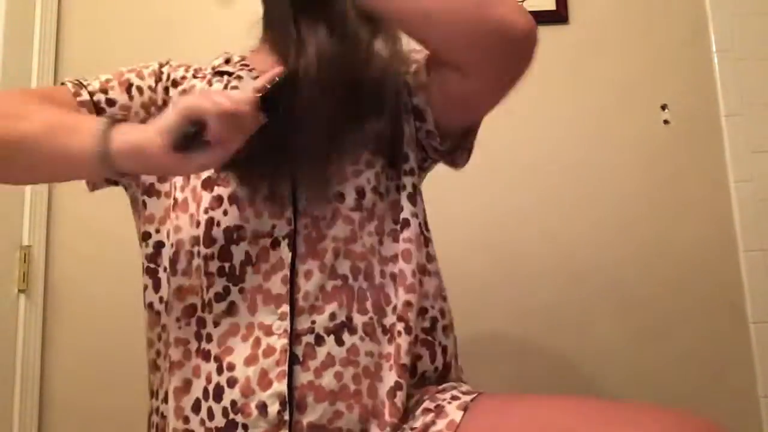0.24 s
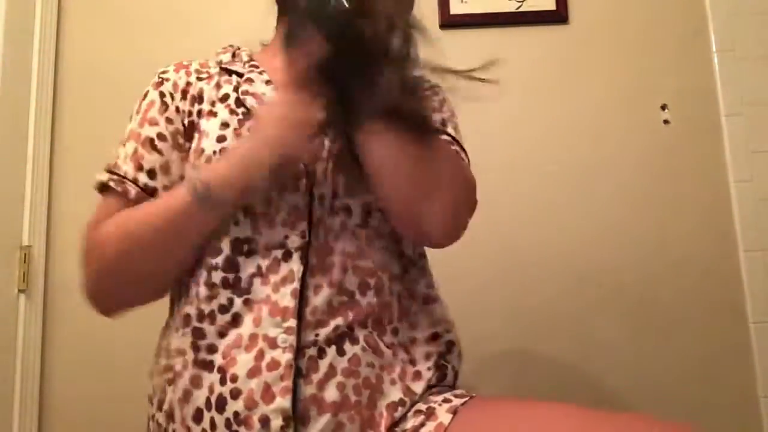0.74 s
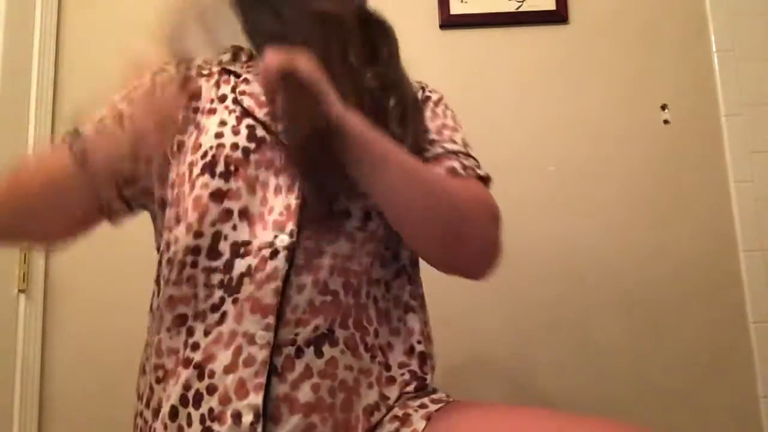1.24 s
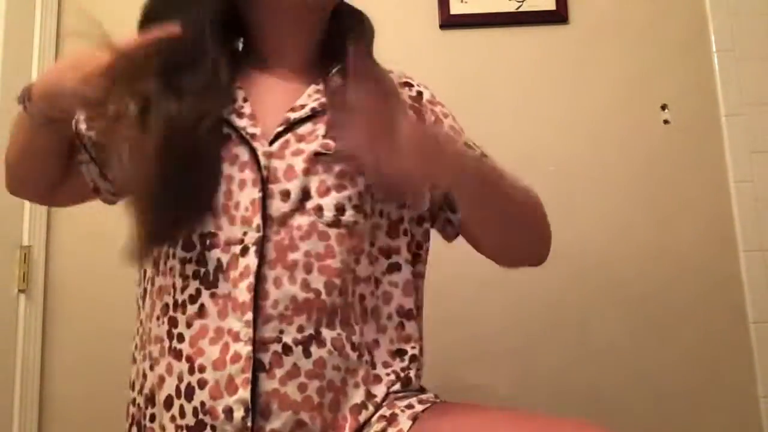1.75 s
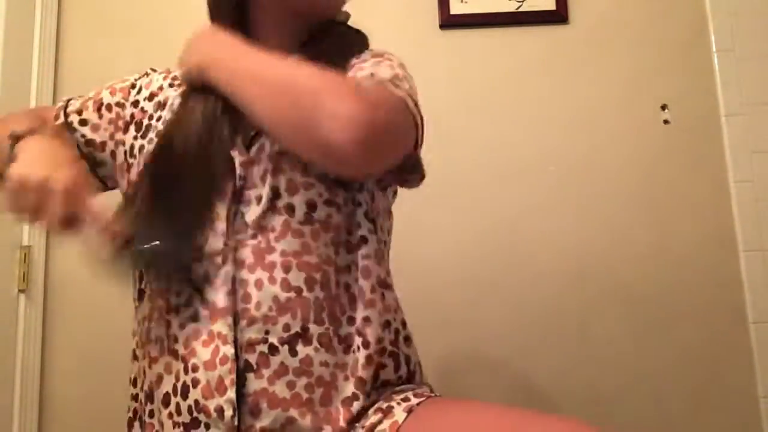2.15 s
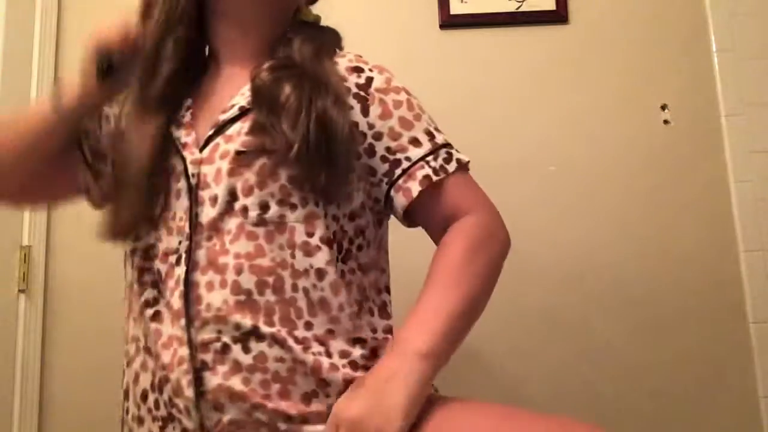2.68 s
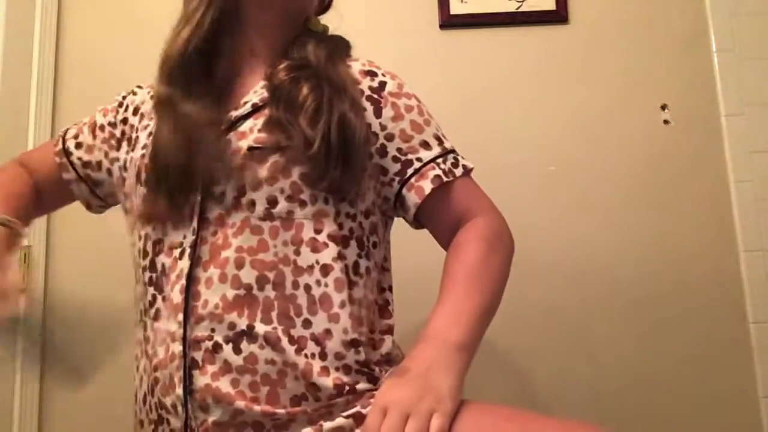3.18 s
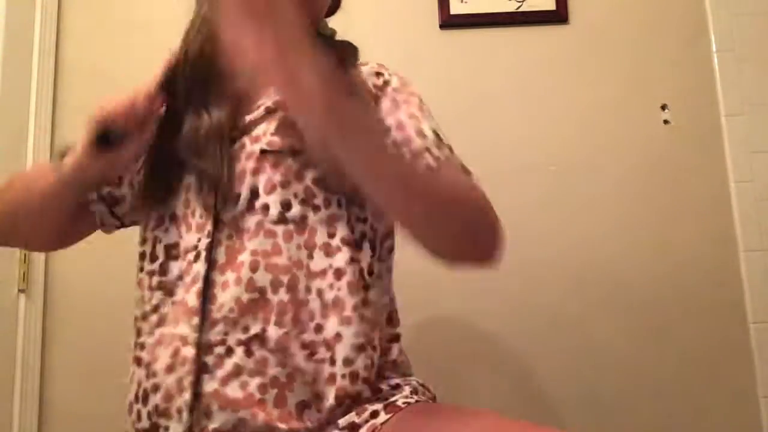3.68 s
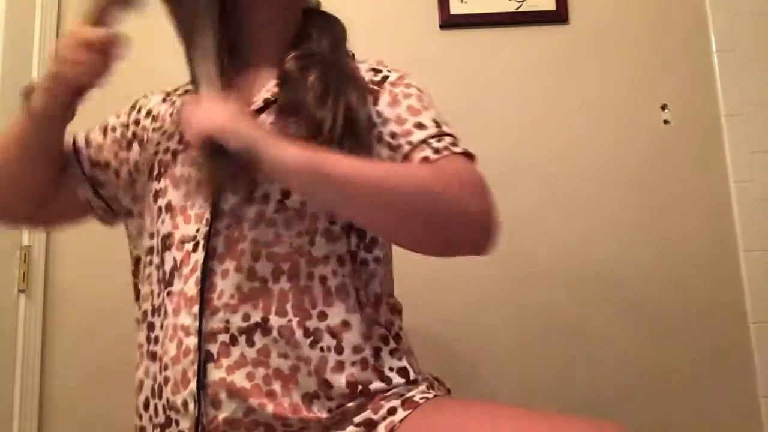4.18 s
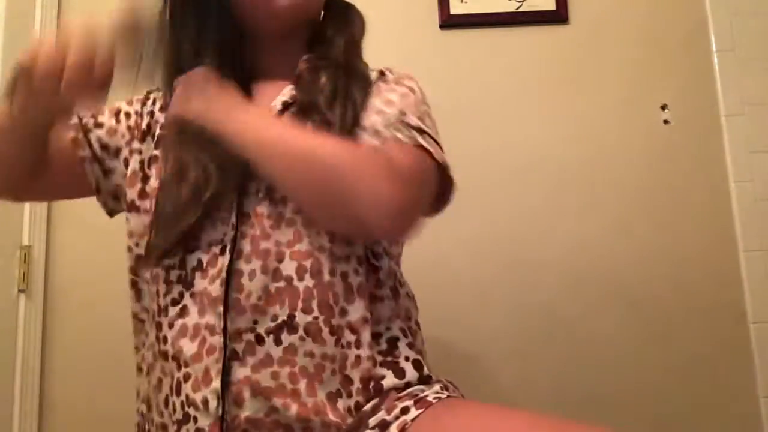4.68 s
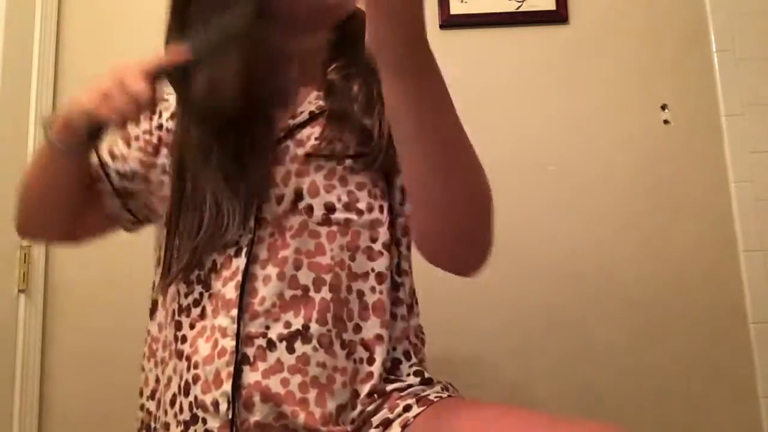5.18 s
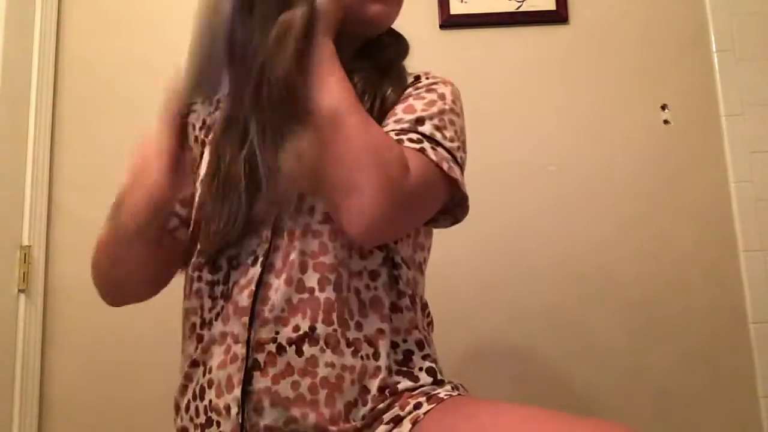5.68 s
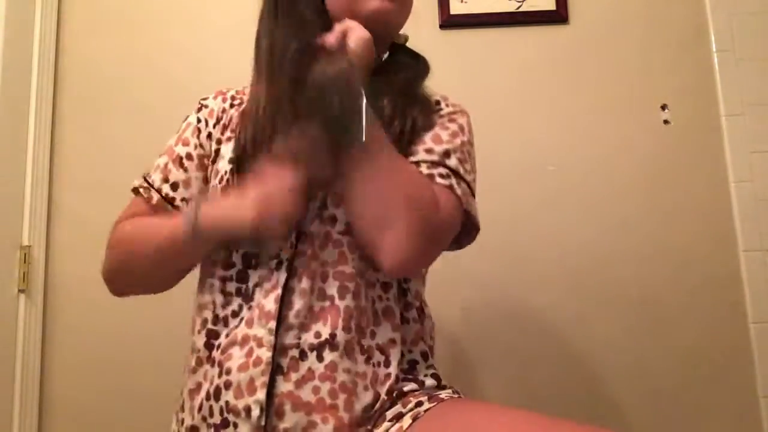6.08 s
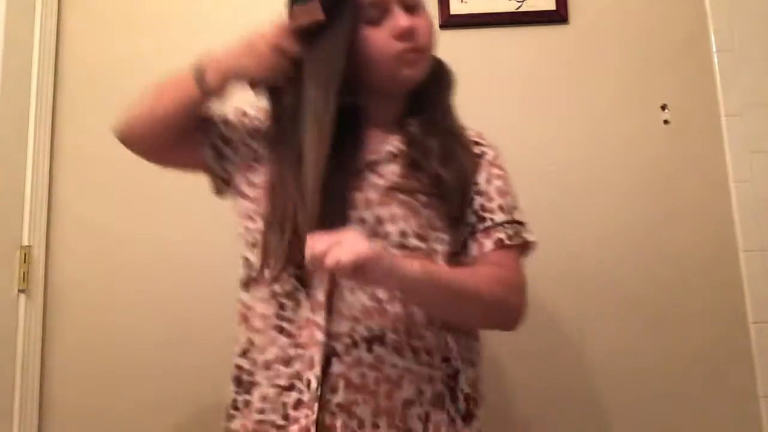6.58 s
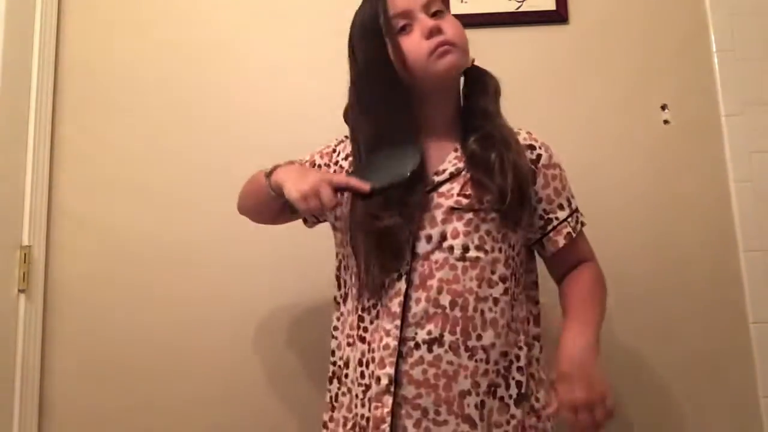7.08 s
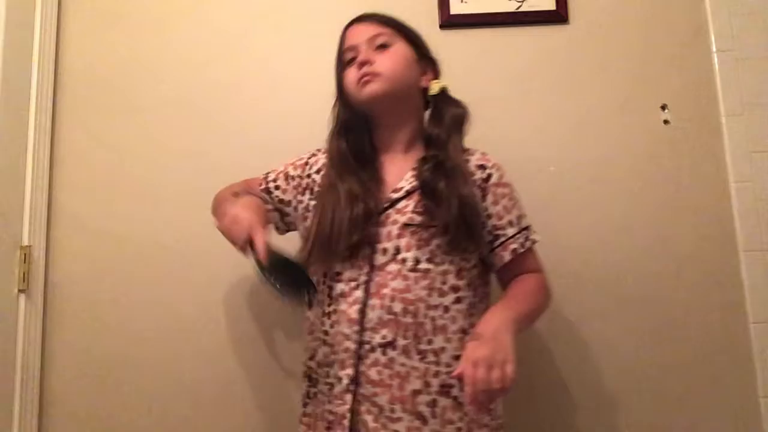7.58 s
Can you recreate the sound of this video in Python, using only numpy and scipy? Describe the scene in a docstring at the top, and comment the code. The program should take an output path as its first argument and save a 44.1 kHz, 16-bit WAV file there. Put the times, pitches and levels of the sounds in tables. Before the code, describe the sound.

A paddle brush swishes through long hair in short, uneven strokes over a ventilation hum, with one loud hollow thump late on.

```python
"""Brushing long hair

A paddle brush works through long hair in short strokes, in a small hard room with humming ventilation. The
cushion knocks as it lands; slipping bristles shake it and scrape the scalp while the strands hiss. Late on,
something hollow nearby takes a thump and a softer second bump, ringing until it is damped, and a dull low thump
follows."""
import sys
import numpy as np
from scipy import signal
from scipy.fft import rfft, irfft, next_fast_len
from scipy.io import wavfile
from scipy.ndimage import map_coordinates

SR = 44100
rng = np.random.default_rng(int(sys.argv[2]) if len(sys.argv) > 2 else 0)


def wrap_up_sound(samples):
    """Save the sound to the file named by the first command line argument, as 16-bit audio."""
    columns = np.atleast_2d(samples).T
    # keep every value between -1 and 1, then stretch to whole-number steps
    tamed = np.clip(columns, -1, 1)
    steps = np.round(tamed * 32767).astype(np.int16)
    wavfile.write(sys.argv[1], SR, steps)


N = 345744

# rumble of the ventilation: f/Hz, level/dB
VENT_COLOUR = [(18, -24), (30, -6), (102, 5.5), (173, -2.5), (244, 5.5), (312, -1.5), (447, 0.5),
               (535, -2.5), (860, -38), (1500, -47), (1950, -57), (3300, -120)]
# room modes that the ventilation drives: f/Hz, width/Hz, level/dB
VENT_DRONES = [(68.4, 19, -64), (123.6, 24, -61), (159.3, 14, -69.5), (227.6, 22, -66), (344, 25, -72),
               (405.9, 20.6, -66.5), (547.2, 27, -69.5)]
# thin electric whine: f/Hz, width/Hz, level/dB
ELECTRIC_WHINE = (11520, 20, -104)
# microphone self-noise: f/Hz, level/dB
MIC_HISS = [(500, 3.5), (1200, 3.5), (2000, -2), (5000, -4), (10000, -10.5), (13500, -10.5), (15000, -20),
            (15700, -28)]
# microphone port resonances: f/Hz, width/Hz, level/dB
MIC_PORT = [(2760, 210, -24), (5020, 330, -14.5), (8970, 610, -6)]
# decay of the room: f/Hz, t60/s
ROOM_DECAY = [(150, 0.54), (600, 0.51), (3000, 0.26), (10000, 0.41)]

# blows on the hollow body: t/s, ring level/dB, crack level/dB, free ring/s, softness/(dB per kHz)
THUMPS = [(6.605, -22.5, -32.5, 0.081, 2), (6.752, -41.5, -68, 0.031, 11.5)]
# modes of the hollow body: f/Hz, level/dB, t60/s
HOLLOW_MODES = [(148.6, -3, 0.3), (177.6, 1, 0.13), (244.8, 5, 0.2), (287.4, -0.5, 0.25), (314, -2, 0.22),
                (377, -4.5, 0.26), (440.8, -8.5, 1), (540, -13.5, 0.2), (713, -16.5, 0.21),
                (1040, -21.5, 0.18), (1607, -21, 0.127), (2200, -33.5, 0.47), (2297, -32, 0.29),
                (3860, -41, .1)]
# its crack and rattle: f/Hz, level/dB
CRACK_COLOUR = [(600, -45), (1000, 3), (1600, -10.5), (2300, -1), (3200, -4), (5000, -13), (7500, -39),
                (10000, -53)]

# cushion of the brush: f/Hz, width/Hz, level/dB
CUSHION_MODES = [(461, 215, -2), (600, 197, 1.5)]
# air under the cushion: f/Hz, width/Hz, level/dB
POCKET_MODE = (346.4, 26.4, -1.2)
# hard back of the brush: f/Hz, width/Hz, level/dB
PADDLE_MODES = [(800, 186, 12.5), (1210, 200, 2), (2390, 130, -2.5), (3050, 110, -13)]
# bed of bristles bending under a pull: f/Hz, width/Hz, level/dB
BRISTLE_MODE = (670, 198, 0)
# low thud on the head: f/Hz, width/Hz, level/dB
HEAD_MODES = [(142, 29, -6.0), (249, 112, -9.5)]
# peaks as the brush lands, plus one dull low thump nearby at 6.9 s: t/s, cushion knock/dB, air puff/dB, head
# thud/dB, paddle clack/dB
LANDINGS = [(0.184, -55, -55, -42, -58), (1.088, -31, -37, -44, -52), (1.37, -37.5, -40, -48, -52),
            (2.431, -47.5, -45.5, -54, -69), (2.868, -35, -45.5, -37, -37.5), (4.076, -49, -43.5, -68, -51),
            (4.629, -44.5, -65, -57, -47), (4.652, -41, -61, -65, -66), (5.743, -46, -39.5, -69, -67),
            (6.126, -33.5, -42.5, -66, -41), (6.395, -34, -44.5, -53.5, -58.5),
            (6.903, -57.5, -75, -40.5, -69), (7.079, -45, -47.5, -48, -68)]
# bristles snag and let go: t/s, peak level/dB, f/Hz, t60/s
SNAGS = [(.183, -65, 2920, .05), (1.017, -69, 4860, 0.068), (1.371, -58.5, 2350, 0.065),
         (1.74, -55, 4060, 0.041), (2.867, -56, 3050, .05), (2.959, -58, 8300, .05), (3.92, -67, 2590, .05),
         (4.076, -58, 2350, 0.056), (4.255, -68, 2730, 0.036), (4.683, -53.5, 7900, .05),
         (4.856, -64, 4520, .05), (4.631, -57, 2370, .04), (5.557, -59, 6790, 0.035),
         (5.742, -65, 2360, 0.033), (5.781, -56, 1500, 0.025), (5.806, -52, 8450, 0.042),
         (5.807, -52.5, 4600, 0.019), (6.394, -59, 2910, 0.044), (6.551, -64, 4220, 0.046),
         (6.577, -55, 4050, 0.055), (6.77, -62, 4500, .02), (6.876, -57.5, 2330, 0.041),
         (7.08, -52.5, 4800, 0.12), (7.811, -56, 10900, 0.053)]

# bristle tips on the scalp: f/Hz, level/dB
SCRAPE_COLOUR = [(500, -37.5), (780, 5), (1050, -1), (1500, -7.5), (1750, -23), (2500, -44.5)]
# hiss of the strands: f/Hz, level/dB
HAIR_COLOUR = [(1300, -6.5), (1900, -3), (2500, 1), (3000, 0), (3900, -6.5), (4500, -1.5), (6000, -16),
               (8000, -21.5), (12000, -34)]
# fine sheen on top of that hiss: f/Hz, level/dB
SHEEN_COLOUR = [(4000, -33), (6000, -3.5), (7500, -3.5), (9000, -3), (11000, -5), (15500, -5)]
# narrow bands and brief hums among the strokes: start/s, end/s, f/Hz, width/Hz, level/dB
SWELLS = [(.38, .85, 4640, 200, -86), (3.353, 3.47, 4370, 640, -78), (3.65, 3.823, 312.4, 8.6, -58),
          (3.875, 3.99, 2600, 1100, -70), (4.65, 4.78, 342, 28, -54.5), (6.028, 6.117, 2320, 300, -85),
          (6.15, 6.24, 2760, 400, -75.5), (6.268, 6.51, 2700, 440, -81), (7.452, 7.84, 8300, 730, -87)]
# pulls of the brush: full at t/s, rise/s, hold/s, fall/s, drag/dB, scrape/dB, hiss/dB, sheen/dB
PULLS = [(0.224, .03, 0.14, .2, -61, -73.5, -77, -83),
         (0.462, 0.29, 0.042, 0.17, -56.5, -65.5, -73.5, -75.5),
         (0.695, 0.3, .12, 0.085, -63.5, -74.5, -78, -78), (1.016, .012, 0.014, 0.091, -73, -96, -76, -100),
         (1.133, 0.076, 0.036, 0.076, -69, -71, -71.5, -75),
         (1.417, .04, 0.039, 0.096, -64, -67, -70, -76.5), (1.604, .1, .02, .15, -68, -84, -87, -95),
         (1.738, .02, 0.0046, 0.19, -69, -83, -71.5, -76.5),
         (1.908, .06, 0.057, 0.27, -60.5, -74.5, -83, -100),
         (2.067, 0.11, 0.09, 0.24, -64, -79, -80.5, -81.5),
         (2.231, 0.077, .005, 0.32, -48, -62.5, -70, -74.5),
         (2.446, 0.068, .005, 0.14, -59, -64, -72.5, -79), (2.723, 0.31, .05, .15, -81, -90, -80.5, -87),
         (2.89, 0.025, .005, 0.088, -46, -55, -70.5, -85), (2.97, .06, 0.032, 0.21, -57, -66, -70, -75),
         (3.107, 0.32, 0.025, 0.33, -54, -66.5, -75.5, -77.5),
         (3.444, 0.46, 0.027, 0.15, -62.5, -71.5, -74, -75), (3.728, .1, 0.0092, 0.075, -71, -82, -87, -95),
         (3.913, 0.082, 0.13, .2, -55.5, -62, -72, -77.5), (4.069, .1, .01, 0.08, -46.5, -63, -69, -75),
         (4.125, .1, 0.046, .05, -54.5, -67, -79, -81), (4.242, 0.067, .005, 0.27, -63, -71, -78.5, -81),
         (4.484, .2, 0.0043, 0.12, -69, -83, -82, -87), (4.661, 0.077, 0.019, 0.21, -50.5, -59.5, -66, -71),
         (4.86, 0.18, .02, 0.088, -73, -68, -78, -80), (5.33, 0.23, 0.029, 0.082, -62, -90, -86, -88),
         (5.42, .1, 0.14, 0.23, -78, -94, -82.5, -81.5),
         (5.594, 0.081, .005, 0.11, -58.5, -66.5, -76.5, -82),
         (5.786, .03, 0.074, 0.1, -55, -65.5, -68.5, -70),
         (6.166, 0.065, 0.028, 0.17, -58.5, -63, -72.5, -82),
         (6.456, 0.049, .03, 0.094, -63, -67.5, -71, -85), (6.591, 0.053, .005, 0.23, -57, -67, -63, -80),
         (6.8, 0.12, .01, 0.12, -66, -87, -89, -92), (6.956, 0.1, 0.0056, 0.17, -65, -75, -74, -80),
         (7.092, 0.035, .005, 0.097, -53.5, -65, -64, -62.5),
         (7.524, 0.37, 0.22, 0.24, -67, -74, -80, -84.5), (7.81, 0.087, 0.018, .1, -63, -74, -75.5, -71)]
# hair still shifting between pulls: drag/dB, scrape/dB, hiss/dB, sheen/dB
REST_LEVELS = (-74.5, -91.5, -91, -100)


def amp(db):
    """Decibels to gain."""
    return 10 ** (np.asarray(db) / 20)


def unit(x):
    """Level a signal to rms 1."""
    return x / np.sqrt(np.mean(x ** 2) + 1e-20)


def along(points, hz):
    """Read a curve of (f/Hz, value) points on a log frequency axis."""
    f, values = np.transpose(points)
    return np.interp(np.log(hz + 1), np.log(f + 1), values)


def wobble(knots_per_s):
    """A smooth random drift."""
    knots = rng.standard_normal(int(N * knots_per_s / SR) + 4)
    return map_coordinates(knots, [np.arange(N) * knots_per_s / SR])


def filtered(x, response):
    """Play x through a complex frequency response."""
    size = next_fast_len(len(x) + SR // 2)
    return irfft(rfft(x, size) * response(np.fft.rfftfreq(size, 1 / SR)), size)[:len(x)]


def coloured(x, colour):
    """EQ x with a (f/Hz, level/dB) curve, then level it to rms 1."""
    return unit(filtered(x, lambda hz: amp(along(colour, hz))))


def resonances(modes):
    """Response of (f/Hz, width/Hz, level/dB) resonators, summed in alternating polarity."""
    return lambda f: sum((-1) ** k * amp(db) * 1j * f * width / (hz * hz - f * f + 1j * f * width)
                         for k, (hz, width, db) in enumerate(modes))


def steep(modes):
    """The resonators applied twice, for darker valleys."""
    return lambda f: resonances(modes)(f) ** 2


def noise_band(hz, width):
    """Noise through one steep resonance, rms 1."""
    return unit(filtered(rng.standard_normal(N), steep([(hz, width, 0)])))


def struck(response, contact_s, shake, t60):
    """A body's answer, peak 1, to a short push and a dying shake; longer contact is duller."""
    t = np.arange(SR // 4) / SR
    push = t / contact_s * np.exp(1 - t / contact_s)
    shudder = shake * amp(-60 * t / t60) * rng.standard_normal(len(t))
    answer = filtered(push + shudder, response)
    return answer / np.abs(answer).max()


def room_tone():
    """The bed: ventilation air, the room modes it drives, an electric whine and microphone hiss."""
    air = amp(-58.5 + 2.5 * wobble(2.787)) * coloured(rng.standard_normal(N), VENT_COLOUR)
    for hz, width, db in VENT_DRONES + [ELECTRIC_WHINE]:
        air += amp(db + 0.61 * wobble(2.31)) * noise_band(hz, width)
    return air + amp(-80.5) * coloured(rng.standard_normal(N), MIC_HISS)


def reverb(x):
    """The hard room answers with a short tail, each frequency dying at its own speed."""
    hz, t, spectra = signal.stft(rng.standard_normal(SR // 2), SR, nperseg=256)
    decay = amp(-60 * t / along(ROOM_DECAY, hz)[:, None])
    tail = signal.istft(spectra * decay, SR, nperseg=256)[1]
    predelayed = np.pad(x, (250, 0))
    return signal.fftconvolve(predelayed, tail / np.linalg.norm(tail))[:N]


def hollow_thumps():
    """A hollow body cracks, rattles and rings until something resting on it damps it."""
    out = np.zeros(N + SR)
    t = np.arange(SR * 6 // 10) / SR
    for start, ring_db, crack_db, free_s, softness in THUMPS:
        damped_s = np.maximum(t - free_s, 0)
        ring = np.zeros(len(t))
        for hz, db, t60 in HOLLOW_MODES:
            damping_db = 60 * damped_s / (0.08 + hz / 4000)  # grips the low, wide motions most
            mode_db = db - softness * hz / 1000 - 60 * t / t60 - damping_db
            ring += amp(mode_db) * np.sin(2 * np.pi * hz * t)
        rattle = coloured(rng.standard_normal(len(t)), CRACK_COLOUR) * np.minimum(t / 0.0009, 1) ** 2
        snap_and_tail = amp(-60 * t / 0.013) + amp(-15.5 - 60 * t / 0.2)
        out[round(start * SR):][:len(t)] += amp(crack_db) * rattle * snap_and_tail
        bloom = 1 - np.exp(-t / 0.0014)  # the body gives just after the crack
        out[round((start + .0018) * SR):][:len(t)] += amp(ring_db) * ring * bloom
    return out[:N]


def brush_hits():
    """Each landing knocks the cushion, puffs its air, thuds on the head and clacks; a late row gives a dull low
    thump nearby; snags tick."""
    out = np.zeros(N + SR)
    for start, knock_db, puff_db, thud_db, clack_db in LANDINGS:
        knock = amp(knock_db) * struck(steep(CUSHION_MODES), contact_s=0.00031, shake=0.78, t60=0.15)
        puff = amp(puff_db) * struck(resonances([POCKET_MODE]), contact_s=0.00035, shake=0.87, t60=0.17)
        thud = amp(thud_db) * struck(resonances(HEAD_MODES), contact_s=0.0011, shake=0.83, t60=0.2)
        clack = amp(clack_db) * struck(resonances(PADDLE_MODES), contact_s=.00005, shake=0.26, t60=0.12)
        out[round(start * SR):][:SR // 4] += knock + puff + thud + clack
    for start, db, hz, t60 in SNAGS:
        bristle = steep([(hz, 0.84 * hz, 0)])
        tick = struck(bristle, contact_s=.00002, shake=0.78, t60=t60)
        out[round(start * SR):][:SR // 4] += amp(db) * tick
    return out[:N]


def strand_slips(per_s, spread_db, grit):
    """Friction: single strands slip in grains of random size over a steady rub."""
    sizes = amp(spread_db * rng.exponential(size=N)) * rng.standard_normal(N)
    grains = unit(sizes * (rng.random(N) < per_s / SR))
    return grit * grains + rng.standard_normal(N)


def pull_envelopes(t, edge_db=20):
    """Gains of drag, scrape, hiss and sheen: each pull climbs edge_db in its rise, holds and falls."""
    power = amp(np.array(REST_LEVELS)[:, None] + 3.5 * wobble(4.1)) ** 2
    for full, rise, hold, fall, *layer_db in PULLS:
        before = np.maximum((full - t) / rise, 0)
        after = np.maximum((t - full - hold) / fall, 0)
        envelope = amp(-edge_db * (before + after))
        power += np.outer(amp(layer_db) ** 2, envelope ** 2)  # overlapping pulls add in power
    return np.sqrt(power)


def brush_strokes():
    """Slipping bristles shake the cushion and scrape the scalp; the strands hiss."""
    t = np.arange(N) / SR
    drag_gain, scrape_gain, hiss_gain, sheen_gain = pull_envelopes(t)
    catch_db = 0.78 * wobble(30)  # the pull catches and lets go
    pull = strand_slips(per_s=400, spread_db=-1.0, grit=0.59)
    cushion = filtered(pull, steep(CUSHION_MODES))
    pocket = filtered(pull, resonances([POCKET_MODE]))
    bristles = filtered(pull, steep([BRISTLE_MODE]))
    drag = unit(cushion + 0.87 * pocket + 0.26 * bristles)
    rub = strand_slips(per_s=1500, spread_db=1.2, grit=.45)
    out = drag_gain * drag + scrape_gain * coloured(pull, SCRAPE_COLOUR)
    out += hiss_gain * coloured(rub, HAIR_COLOUR) + sheen_gain * coloured(rub, SHEEN_COLOUR)
    for start, end, hz, width, db in SWELLS:
        progress = np.clip((t - start) / (end - start), 0, 1)
        swell = np.sin(np.pi * progress) ** .5
        out += amp(db) * swell * noise_band(hz, width)
    return amp(catch_db) * out


def scene():
    """The mono mix: dry strokes up front, hits and thumps with reverb, room tone underneath."""
    hits, thumps = brush_hits(), hollow_thumps()
    brush = brush_strokes() + hits + amp(-4.0) * reverb(hits)
    hollow = thumps + amp(-6.5) * reverb(thumps)
    return (brush + hollow + room_tone())[None]


def record(dry):
    """A small microphone sheds the deep bass, rings at its port and cuts the very top."""
    low_cut_hz, top_hz = 45, 15700

    def microphone(hz):
        low_cut = (1j * hz / (low_cut_hz + 1j * hz)) ** 4
        port = 1 + sum(resonances([mode])(hz) for mode in MIC_PORT)
        return low_cut * port * (hz < top_hz)
    return filtered(dry[0], microphone)[None]


dry = scene()
out = record(dry)
wrap_up_sound(out)
```